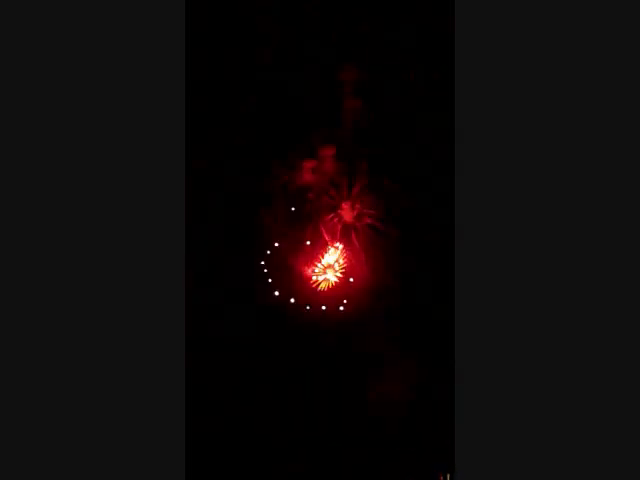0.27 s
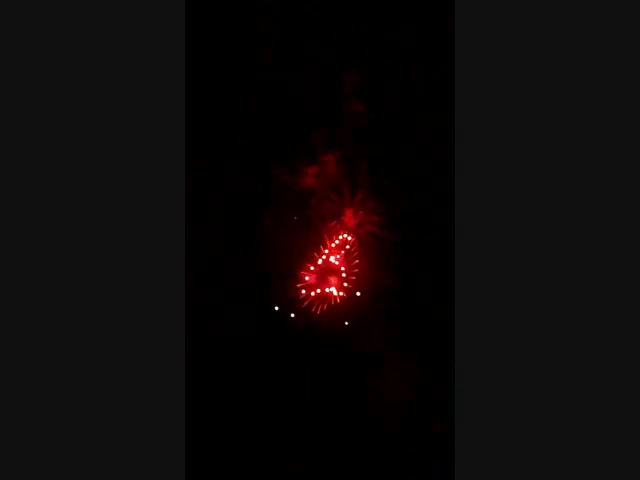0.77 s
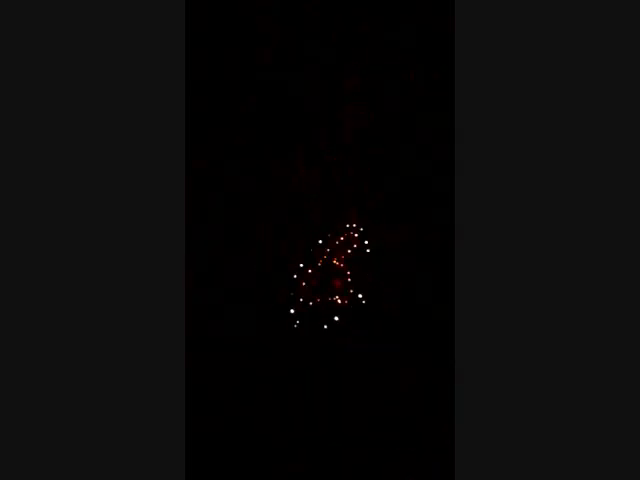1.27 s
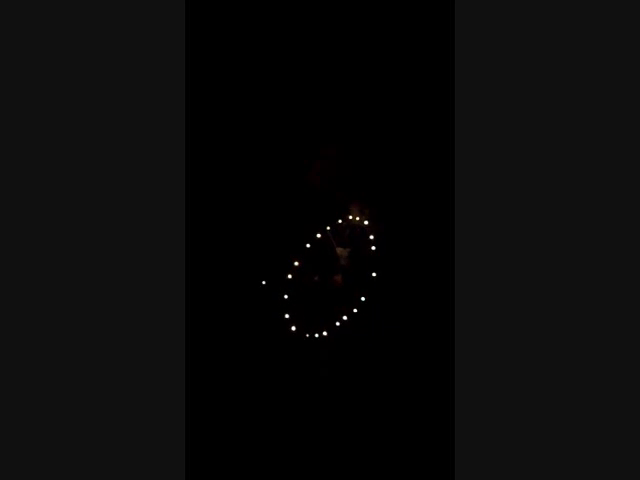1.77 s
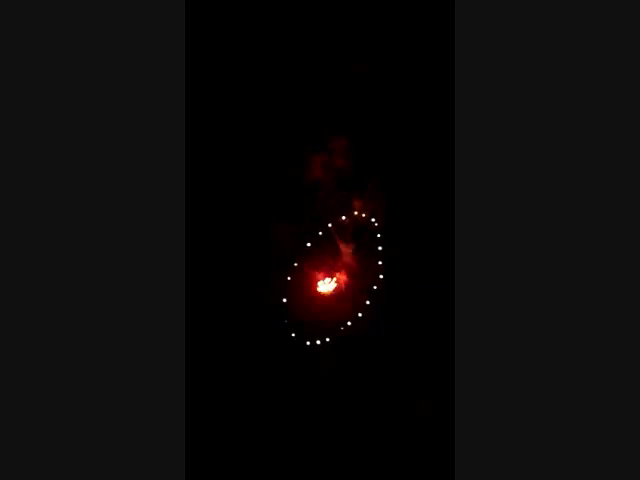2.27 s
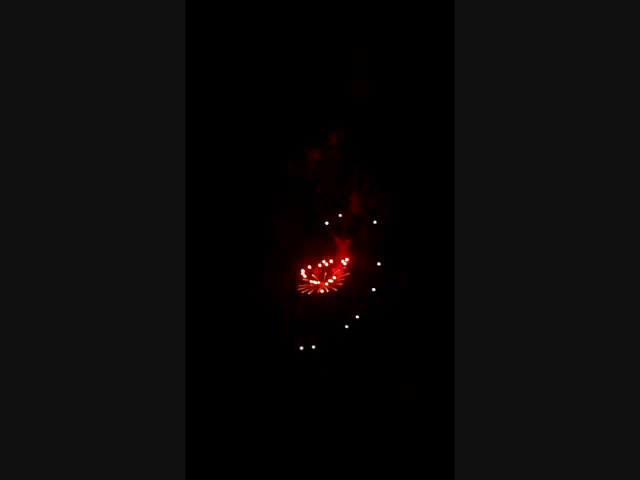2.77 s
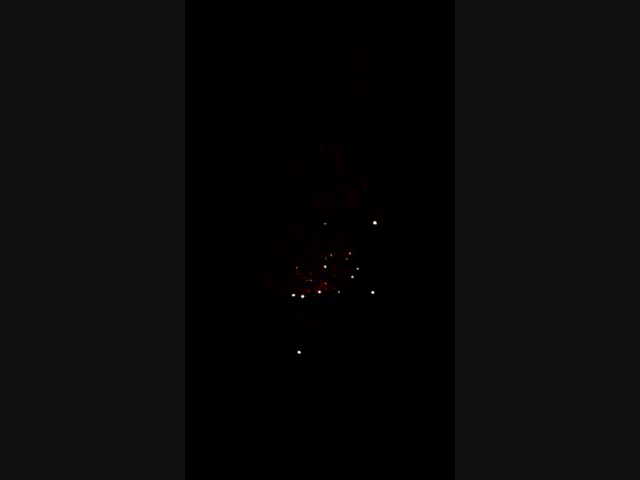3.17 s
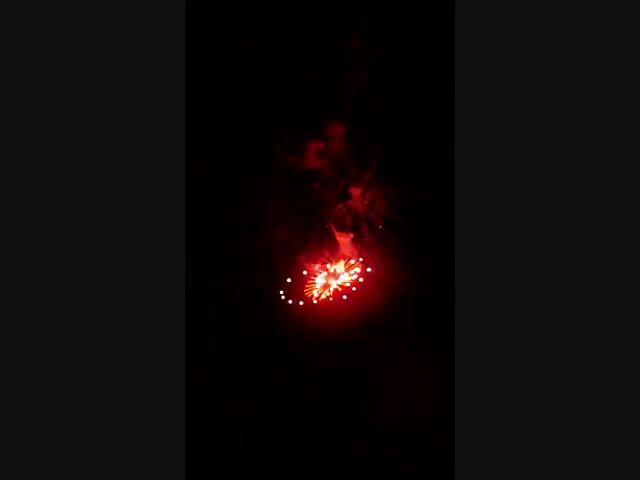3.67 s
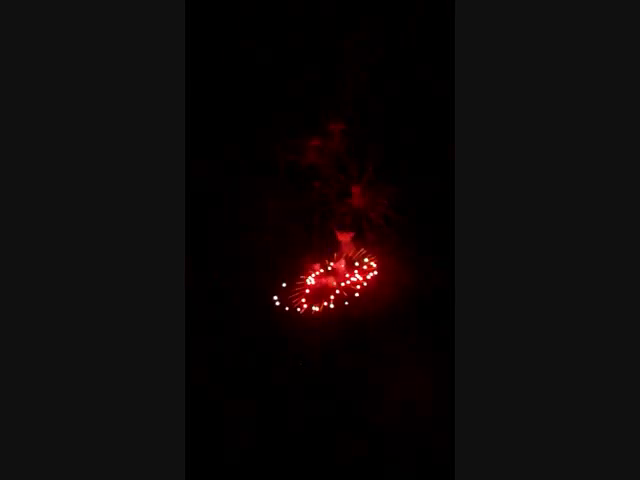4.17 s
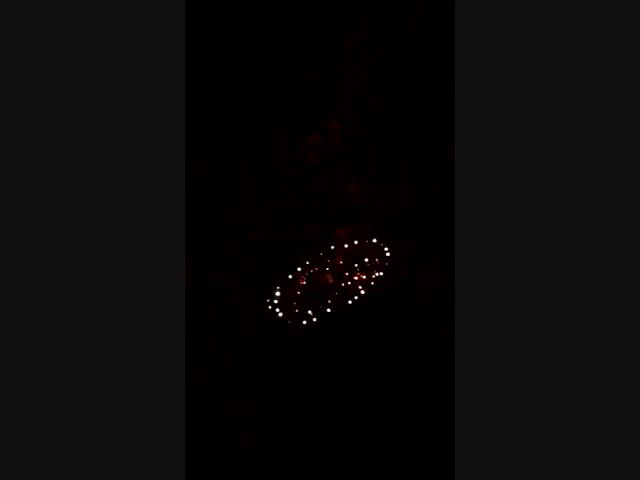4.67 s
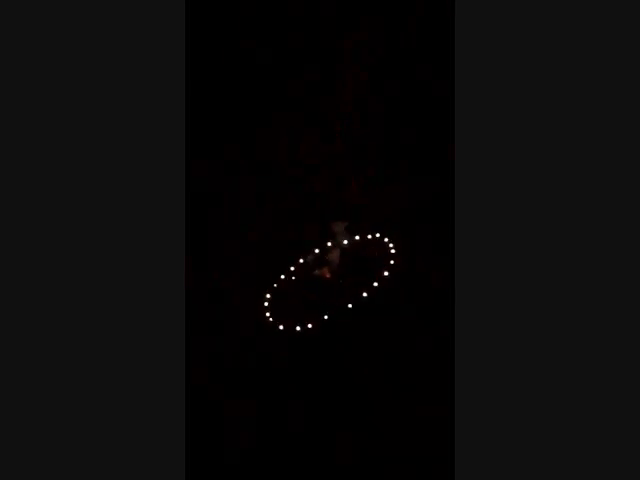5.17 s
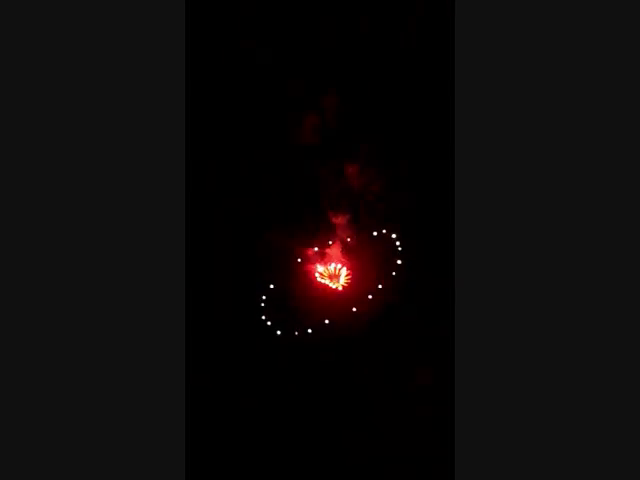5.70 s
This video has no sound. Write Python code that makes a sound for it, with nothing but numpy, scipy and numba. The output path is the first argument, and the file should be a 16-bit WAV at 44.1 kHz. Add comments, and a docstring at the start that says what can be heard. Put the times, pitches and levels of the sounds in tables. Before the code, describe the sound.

The rolling echo of a firework fades outdoors as a mortar thumps. Three aerial shells then burst at uneven intervals with sharp, dry bangs, the last cracking hardest, while three more launches thump between and after them. Each bang comes back from buildings and hills as quick thuds and a fading roar over a constant low rumble. A small microphone overloads on the bursts, rasps faintly and briefly dips in level.

```python
"""A low rolling echo of a firework is dying away; mortars thump and more shells burst overhead.
Each pressure wave arrives as a dry bang; buildings and hills send it back as thuds,
and countless fainter echoes merge into a roar over the rumble.
A small microphone overloads on the bursts and rasps on the rumble's large pressure swings;
the gain ducks after loud bangs and creeps back."""
import sys
import numpy as np
from scipy import signal
from scipy.io import wavfile
from scipy.ndimage import uniform_filter1d
from numba import njit

SR = 44100
rng = np.random.default_rng(int(sys.argv[2]) if len(sys.argv) > 2 else 0)


def output_pcm(signal):
    """Save a mono or channel-first signal as 16-bit PCM at the path in sys.argv[1].

    Samples are clipped to [-1, 1] before scaling.
    """
    pcm = np.clip(np.atleast_2d(signal).T, -1, 1) * 32767
    wavfile.write(sys.argv[1], SR, np.round(pcm).astype(np.int16))


N = 261954
TIME_S = np.arange(N) / SR

# spectral shapes of the echo layers, microphone rasp, sizzle and shock crack: f/Hz, level/dB
RUMBLE_SPECTRUM = [(12, -18), (25, -2.5), (50, 2), (90, 0.5), (150, -3), (210, -14.5), (320, -31.5),
                   (700, -79)]
ROAR_SPECTRUM = [(100, -16.5), (200, -1.5), (280, -3), (390, -1.5), (540, -1.5), (700, -3.5), (920, -3),
                 (1400, -11), (1800, -15.5), (3000, -76)]
BRIGHT_SPECTRUM = [(900, -21), (1500, 2), (1900, -5.5), (2300, -4.5), (3000, -8.5), (3600, -14.5),
                   (4300, -20.5), (6000, -58.5)]
HOLLOW_SPECTRUM = [(330, -41.5), (450, -7), (520, 0), (590, -1.5), (670, -11.5), (850, -45.5)]
DRUM_SPECTRUM = [(120, -26), (190, 0.5), (270, 3.5), (330, 2), (410, 1), (520, -21), (800, -59)]
MIC_RASP_SPECTRUM = [(2000, -32.5), (3300, 0.5), (4300, 12), (5200, 3), (7000, -1.5), (8500, -4.5),
                     (11000, -12)]
SIZZLE_SPECTRUM = [(4000, -44.5), (4900, 3), (6000, 3.5), (7200, 0.5), (8800, -1.5), (11000, -22)]
CRACK_SPECTRUM = [(100, 8.5), (400, -9.5), (950, 7.5), (1650, -8.5), (2400, -13), (4000, -11.5),
                  (8000, -17), (16000, -56)]
# steady background: level/dB of rumble, roar, bright, hollow, drum, mic rasp
FLOOR_DB = (-23, -36, -57, -50.5, -39.5, -50)
# scattering ground, buildings, hills: crest delay/s, rise/s, fall/(dB/s), crest level/dB per layer
SHELL_TERRAIN = [(.025, 0.03, 105.5, -6.5, -19, -25.5, -26, -21.5, -29),
                 (.137, .018, 34.5, -9, -19.5, -25, -28, -24, -33.5),
                 (.64, 0.37, 23.5, -16, -21.5, -34.5, -24, -32, -45),
                 (1.5, 0.54, 9, -22, -30, -44.5, -29.5, -41.5, -53.5)]
MORTAR_TERRAIN = [(.03, 0.013, 24.9, -24, -33.5, -41, -43, -42.5, -56),
                  (.34, 0.11, 40, -21.5, -28.5, -42, -39.5, -42.5, -47)]
# walls returning one echo each: delay/s, thud/dB, tick/dB
SHELL_REFLECTORS = [(.12, -20.5, -13), (.374, -4.5, -22), (.525, -7.5, -24), (.625, -8.5, -25),
                    (.695, -11.5, -31.5), (.795, -7, -29), (.872, -7, -28.5), (1.421, -24, -31),
                    (1.783, -9, -30.5)]
MORTAR_REFLECTORS = [(.21, -5.5, -23), (.3, -5.5, -28), (.394, -8.5, -29)]
# ground and close surfaces: delay/ms, reflected share
NEAR_REFLECTORS = [(2.5, 0.32), (4.002, 0.9), (5.4, 0.27)]
# shell burst before t = 0, still echoing: t/s, echo/dB, extra bass/dB, extra hollow/dB
ECHOING_SHELL = (-0.7463, -1.38, -6.5, -6.5)
# mortar shots: t/s, push/dB, swing/ms, suction share, recovery/ms, mirrored share, crack/dB,
# knock/dB, echo/dB
MORTAR_SHOTS = [(0.4455, 1.5, 9.3, 0.81, 5.2, 0.25, -13, -6.5, 0),
                (1.5093, -2, 6.9, 1.5, 4.6, 0.088, -13, -9.5, -8.5),
                (3.8444, -0.5, 6.5, 1.01, 5.8, 0.072, -11.5, -4, -7.5),
                (5.3108, 3.5, 6.5, 0.58, 5.5, 0.23, -12, -7.5, 3.8)]
# mortar tube modes: f/Hz, level/dB, decay/ms
TUBE_MODES = [(970, 4.5, 1), (2240, -10.5, 1.6)]
# shell bursts: t/s, push/dB, swing/ms, suction share, recovery/ms, mirrored share, crack/dB,
# boom/dB, boom f/Hz, echo/dB, extra bass/dB, extra hollow/dB
SHELL_BURSTS = [(1.259, 12.5, 2.63, 0.34, 11.2, 0.83, 0, -8, 122, 1, 1, -0.5),
                (3.463, 19, 2.1, 0.8, 2.8, 0.54, -0.5, -17, 266, -5.5, -6, -8),
                (4.5239, 19.5, 2.44, 0.51, 12.3, 0.64, 7.5, -5.5, 131, 0.5, -0.5, 0)]
# microphone response: f/Hz, level/dB
MIC_RESPONSE = [(20, -0.5), (2500, -2.5), (3400, -8), (4300, -18.5), (5200, -8.5), (7000, -6.5),
                (8400, -11), (9500, -25), (11000, -49.5)]


def amp(db):
    return 10 ** (np.asarray(db) / 20)


def unit_rms(x):
    return x / np.sqrt(np.mean(x ** 2) + 1e-20)


def add(mix, start_s, sound):
    part = mix[round(start_s * SR):][:len(sound)]
    part += sound[:len(part)]


def colour(x, spectrum):
    """Minimum-phase filter with the given response."""
    size = 8192
    hz, db = np.transpose(spectrum)
    bins_hz = abs(np.fft.fftfreq(size, 1 / SR))
    log_gain = np.log(amp(np.interp(np.log(bins_hz + 1), np.log(hz + 1), db)))
    taps = np.fft.ifft(np.exp(np.conj(signal.hilbert(log_gain)))).real[:size // 2]
    return signal.oaconvolve(x, taps)[:len(x)]


def steady(x, window_s):
    """Holds the slow level at rms 1; keeps the quick flutter."""
    return x / np.sqrt(abs(uniform_filter1d(x ** 2, int(window_s * SR))) + 1e-12)


def arrivals(per_s, spread_db, wash):
    """Sparse, uneven wave fronts over a wash of those too dense to tell apart."""
    sizes = amp(spread_db * np.minimum(rng.exponential(1, N), 3)) * rng.choice([-1, 1], N)
    fronts = unit_rms(sizes * (rng.random(N) < per_s / SR))
    return unit_rms(fronts + wash * rng.standard_normal(N))


def echo_paths(shell_paths, mortar_paths):
    """Each bang with each way back: t/s, echo/dB, extra bass/dB, extra hollow/dB, path."""
    for start_s, *_, echo_db, bass_db, hollow_db in [ECHOING_SHELL, *SHELL_BURSTS]:
        for path in shell_paths:
            yield start_s, echo_db, bass_db, hollow_db, path
    for start_s, *_, echo_db in MORTAR_SHOTS:
        for path in mortar_paths:
            yield start_s, echo_db, 0, 0, path


def terrain_swells():
    """Gains of five echo layers and the mic rasp: each swell crests and dies away; powers add."""
    grid_s = TIME_S[::64]
    power = np.outer(amp(FLOOR_DB) ** 2, np.ones(len(grid_s)))
    for start_s, echo_db, bass_db, hollow_db, path in echo_paths(SHELL_TERRAIN, MORTAR_TERRAIN):
        delay_s, rise_s, fall_db_per_s, *crest_db = path
        past_crest_s = grid_s - start_s - delay_s
        rise = (grid_s > start_s) * np.exp(-(np.minimum(past_crest_s, 0) / rise_s) ** 2)
        fall = amp(-fall_db_per_s * np.maximum(past_crest_s, 0))
        extra_db = np.array([bass_db, 0, 0, hollow_db, 0, 0])
        power += np.outer(amp(echo_db + extra_db + crest_db), rise * fall) ** 2
    return [np.interp(TIME_S, grid_s, gain) for gain in np.sqrt(power)]


def roll():
    """Scattered echoes: long waves rumble, short ones roar. The microphone adds its rasp."""
    gains = terrain_swells()
    fronts = arrivals(per_s=700, spread_db=3, wash=0.9)
    long_fronts = arrivals(per_s=250, spread_db=1.5, wash=0.6)
    rumble = steady(colour(long_fronts, RUMBLE_SPECTRUM), 0.07)
    roar = steady(colour(fronts, ROAR_SPECTRUM), 0.14)
    bright = steady(colour(fronts, BRIGHT_SPECTRUM), 0.12)
    hollow = steady(colour(rng.standard_normal(N), HOLLOW_SPECTRUM), 0.071)
    drum = steady(colour(arrivals(per_s=300, spread_db=-1, wash=0.7), DRUM_SPECTRUM), 0.093)
    layers = rumble, roar, bright, hollow, drum, mic_rasp(rumble, gains[-1])
    return sum(gain * layer for gain, layer in zip(gains, layers))


def mic_rasp(rumble, gain, sizzle_from_db=-32):
    """Microphone hiss swelling with the rumble's large pressure swings; a smooth sizzle when loud."""
    hiss = steady(rng.standard_normal(N) * (1 + 0.47 * rumble ** 2), 0.09)
    rasp = unit_rms(colour(hiss, MIC_RASP_SPECTRUM))
    sizzle = unit_rms(colour(rng.standard_normal(N), SIZZLE_SPECTRUM))
    return rasp + gain / amp(sizzle_from_db) * sizzle


def n_wave(t_ms, rise_ms, swing_ms, suction, recovery_ms):
    """Blast pressure: steep push, slide into suction, return to rest."""
    return np.interp(t_ms, np.cumsum([0, rise_ms, swing_ms, recovery_ms]), [0, 1, -suction, 0])


def wall_echoes():
    """Far walls return a rounded, rebounding thud and a small tick of the crack."""
    t_ms, out = np.arange(SR // 10) * 1000 / SR, np.zeros(N)
    grit = steady(colour(rng.standard_normal(N), CRACK_SPECTRUM), 0.0053)
    rebound = 0.64 * n_wave(t_ms - 8.5, 4.8, 5.5, 0.29, 6.9)
    thud = 0.47 * n_wave(t_ms, 1.8, 4.2, 2.51, 3.5) + rebound
    for start_s, echo_db, bass_db, _, path in echo_paths(SHELL_REFLECTORS, MORTAR_REFLECTORS):
        delay_s, thud_db, tick_db = path
        arrival_s = start_s + delay_s
        if arrival_s > 0:
            tick = np.roll(grit, -round(arrival_s * SR))[:len(t_ms)] * np.exp(-t_ms / 4.4)
            add(out, arrival_s, amp(echo_db) * (amp(thud_db + bass_db) * thud + amp(tick_db) * tick))
    return out


def blast(push_db, swing_ms, suction, recovery_ms, mirrored_share, crack_db):
    """N wave with a ragged front, repeated by close surfaces."""
    t_ms = np.arange(SR // 10) * 1000 / SR
    grit = steady(colour(rng.standard_normal(SR), CRACK_SPECTRUM), 0.0081)[-len(t_ms):]
    mirrored = sum(share * n_wave(t_ms - delay_ms, 0.61, 1.06, 0.23, 2.8)
                   for delay_ms, share in NEAR_REFLECTORS)
    wave = n_wave(t_ms, 0.28, swing_ms, suction, recovery_ms) + mirrored_share * mirrored
    rasp = 0.25 * np.minimum(abs(wave), 1)
    crack = grit * (np.exp(-t_ms / 2.6) + rasp)
    return amp(push_db) * wave + amp(crack_db) * crack


def mortars():
    """Each mortar sends a slow blast with the short knock of its tube."""
    t_ms, out = np.arange(SR // 10) * 1000 / SR, np.zeros(N)
    knock = sum(amp(db) * np.sin(2 * np.pi * hz * t_ms / 1000) * np.exp(-t_ms / decay_ms)
                for hz, db, decay_ms in TUBE_MODES)
    for start_s, *shape, knock_db, _ in MORTAR_SHOTS:
        add(out, start_s, blast(*shape) + amp(knock_db) * knock)
    return out


def shells(boom_rise_ms=8, boom_decay_ms=190):
    """Each shell sends a sharp blast; the surroundings boom."""
    t_ms, out = np.arange(SR) * 1000 / SR, np.zeros(N)
    envelope = (1 - np.exp(-t_ms / boom_rise_ms)) * np.exp(-t_ms / boom_decay_ms)
    for start_s, *shape, boom_db, boom_hz, _, _, _ in SHELL_BURSTS:
        band = signal.butter(2, [boom_hz / 1.47, boom_hz * 1.26], "band", fs=SR, output="sos")
        boom = steady(signal.sosfilt(band, rng.standard_normal(SR)), 0.035)
        add(out, start_s, blast(*shape))
        add(out, start_s, amp(boom_db) * boom * envelope)
    return out


@njit
def gain_control(x, threshold, duck_db_per_s, max_cut_db, recover_db_per_s, lag_s):
    """Ducks late, at the duck rate times the output's excess over threshold; recovers steadily."""
    lag = round(lag_s * SR)
    out, cut_db = np.zeros(len(x)), np.zeros(len(x) + lag + 1)
    for i in range(len(x)):
        out[i] = x[i] * 10 ** (-cut_db[i] / 20)
        excess = max(min(abs(out[i]), 1.) - threshold, 0.)
        step_db = (duck_db_per_s * excess - recover_db_per_s) / SR
        cut_db[i + lag + 1] = min(max(cut_db[i + lag] + step_db, 0.), max_cut_db)
    return out


def scene():
    """Bangs, wall echoes and roll, summed in mono."""
    return (shells() + mortars() + wall_echoes() + roll())[None]


def record(dry):
    """Gain ducking, microphone overload and response, clipping, band limit."""
    ducked = gain_control(dry[0], threshold=0.43, duck_db_per_s=4000, max_cut_db=11.,
                          recover_db_per_s=32, lag_s=0.011)
    saturated = ducked / (1 + ducked ** 6) ** (1 / 6)
    low_cut_hz, high_cut_hz = 3, 16200
    centred = signal.lfilter(*signal.butter(1, low_cut_hz, "high", fs=SR), saturated)
    clipped = np.clip(1.1 * colour(centred, MIC_RESPONSE), -0.985, 0.985)
    lowpass = signal.firwin(255, high_cut_hz, window=("kaiser", 9), fs=SR)
    return signal.oaconvolve(clipped, lowpass, "same")[None]


dry = scene()
out = record(dry)
output_pcm(out)
```